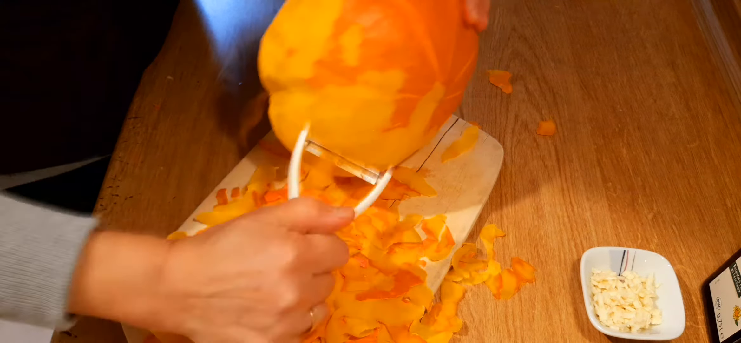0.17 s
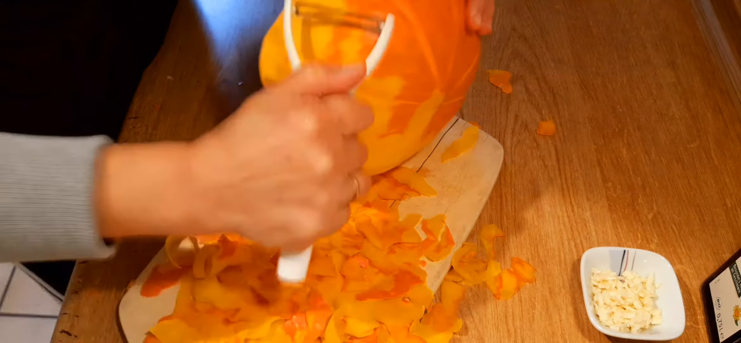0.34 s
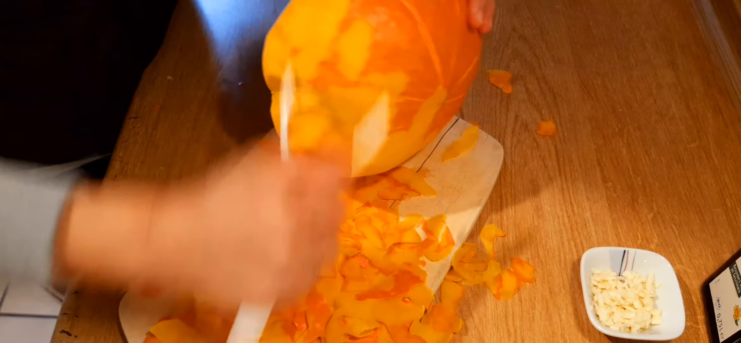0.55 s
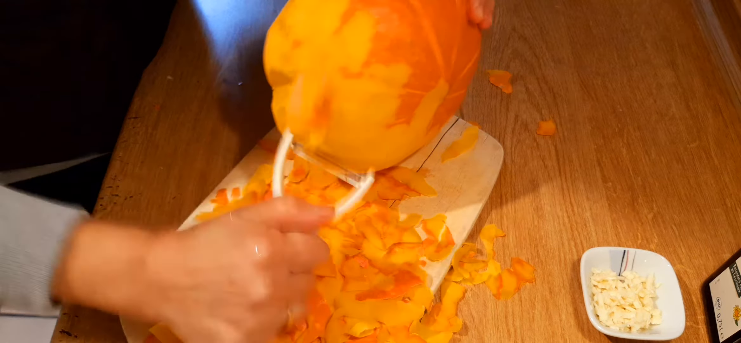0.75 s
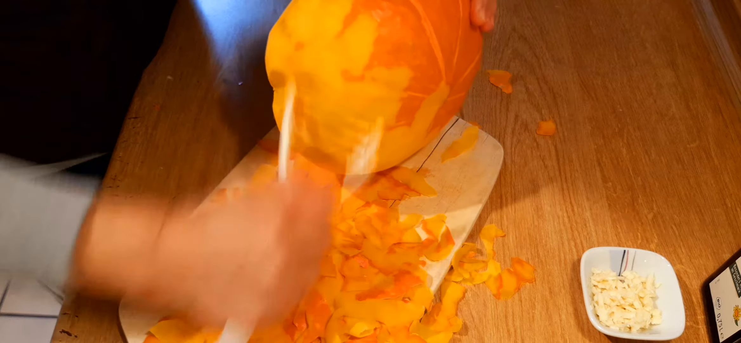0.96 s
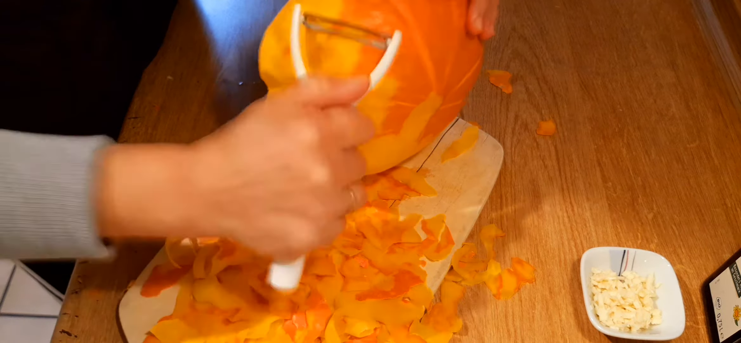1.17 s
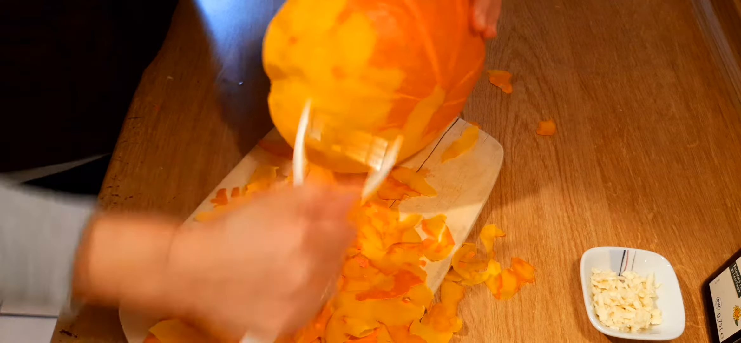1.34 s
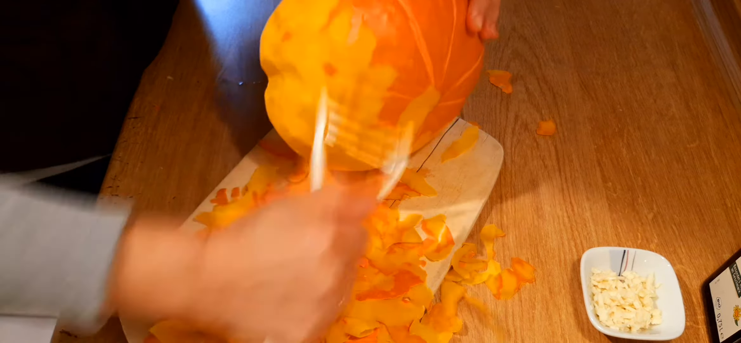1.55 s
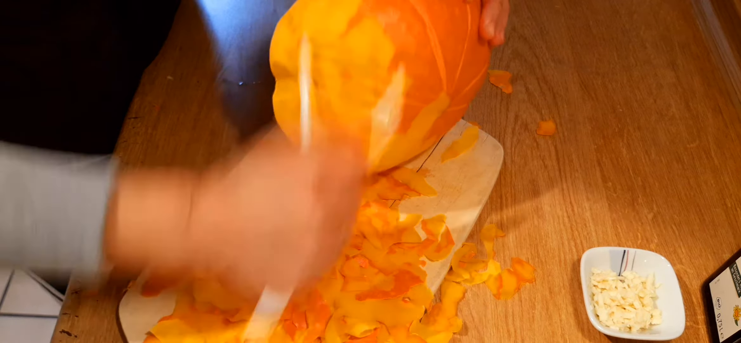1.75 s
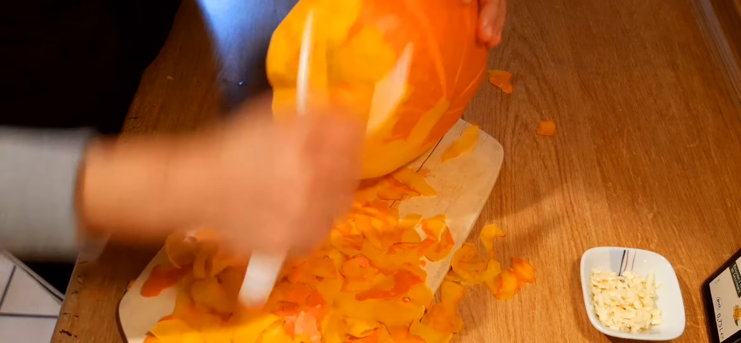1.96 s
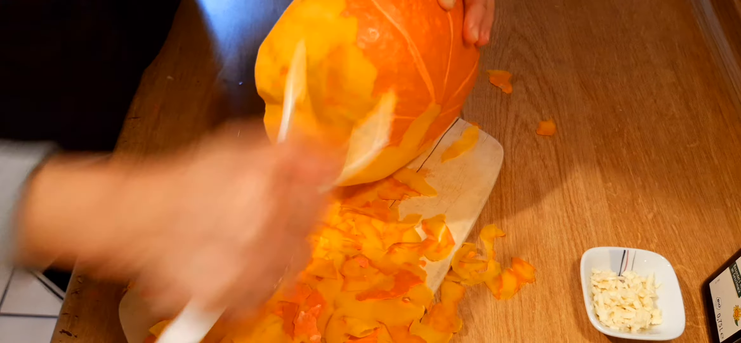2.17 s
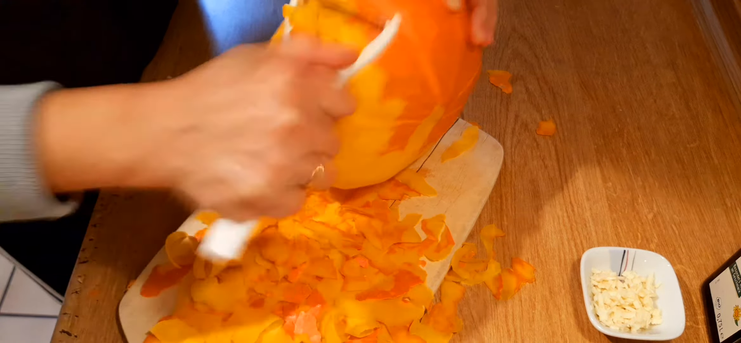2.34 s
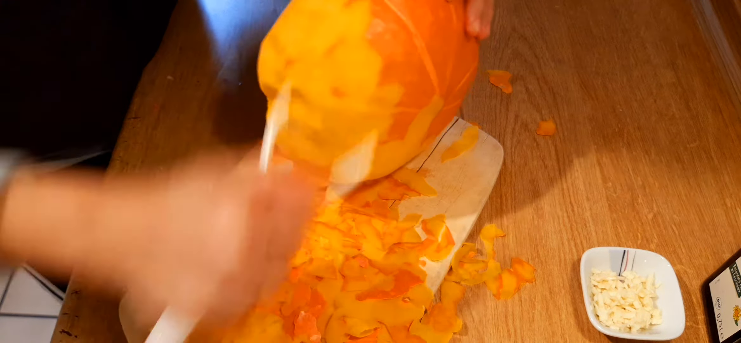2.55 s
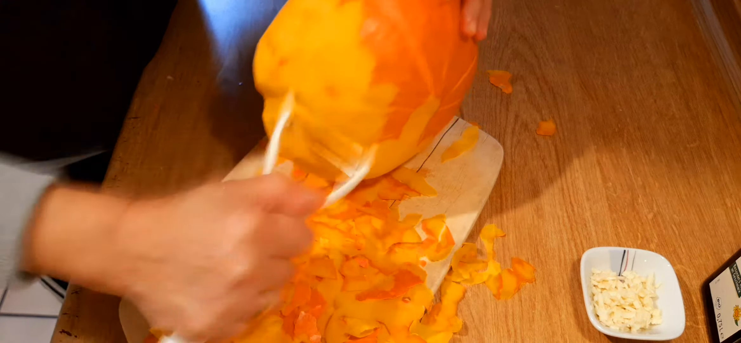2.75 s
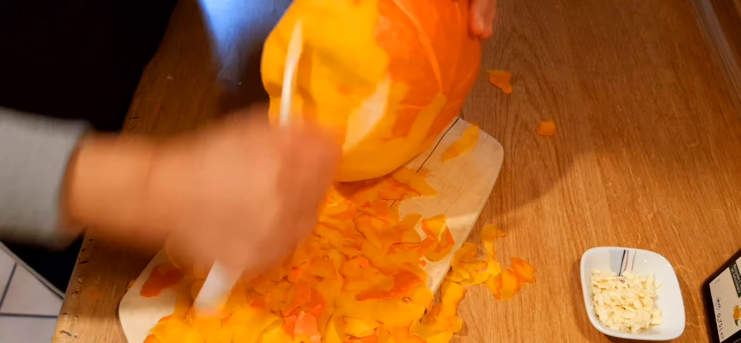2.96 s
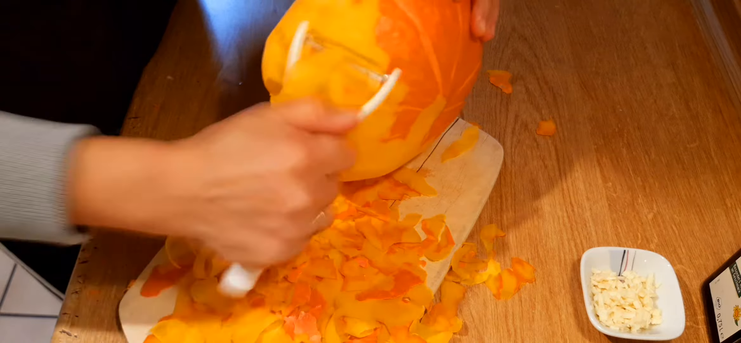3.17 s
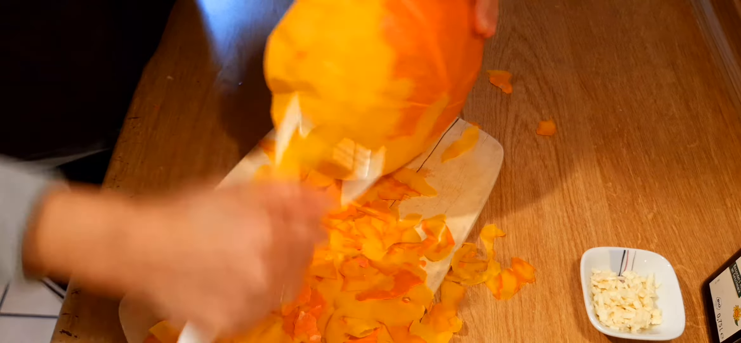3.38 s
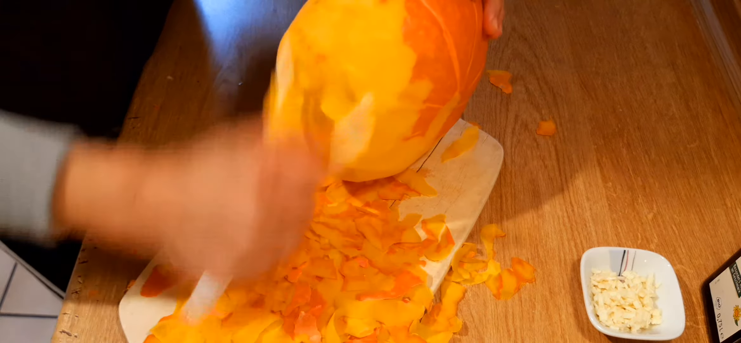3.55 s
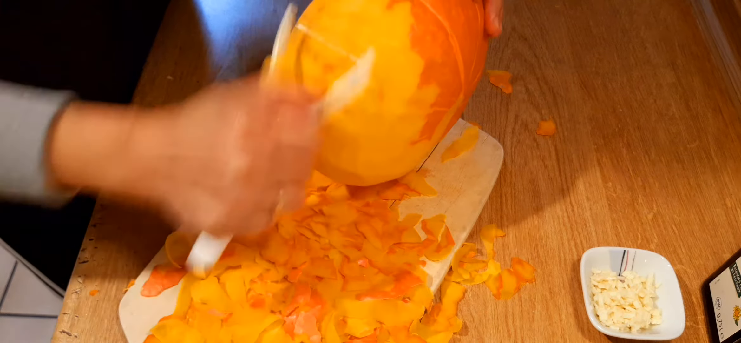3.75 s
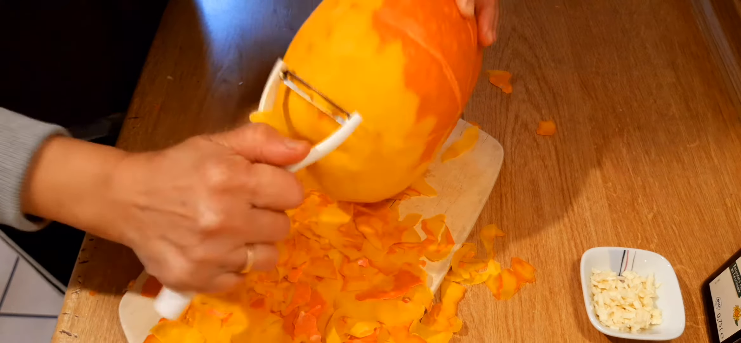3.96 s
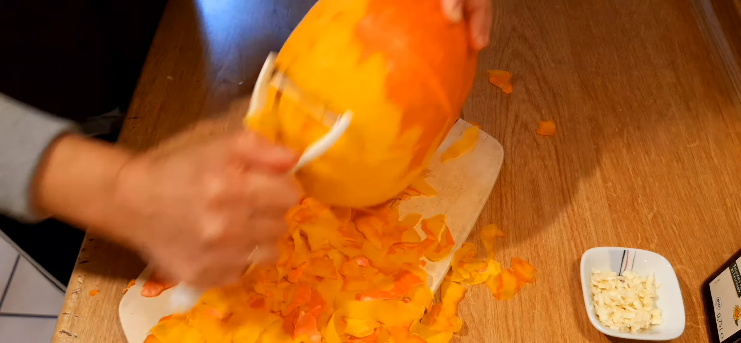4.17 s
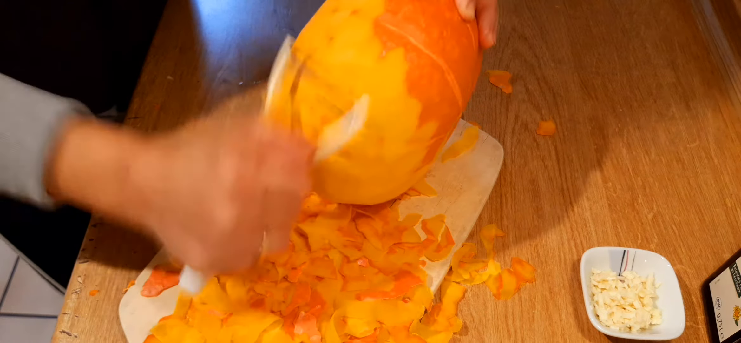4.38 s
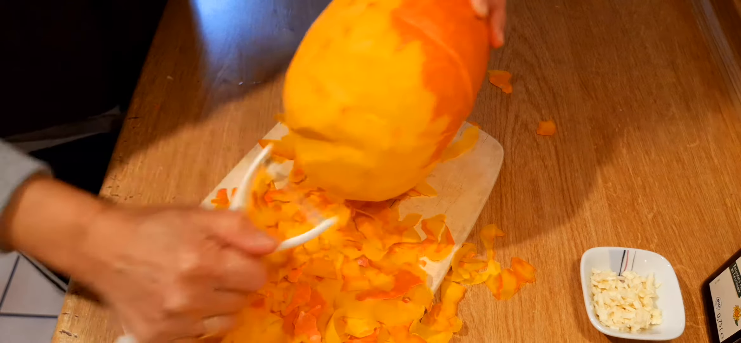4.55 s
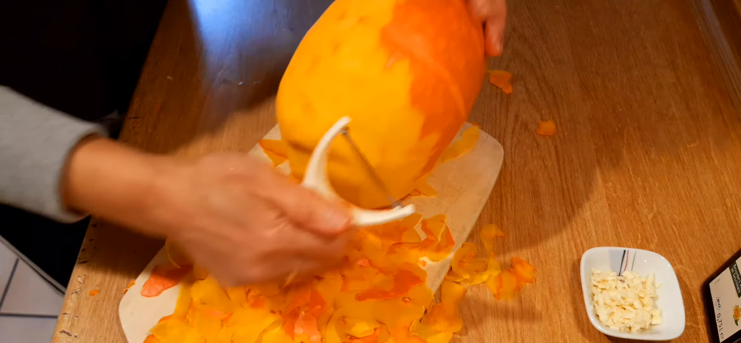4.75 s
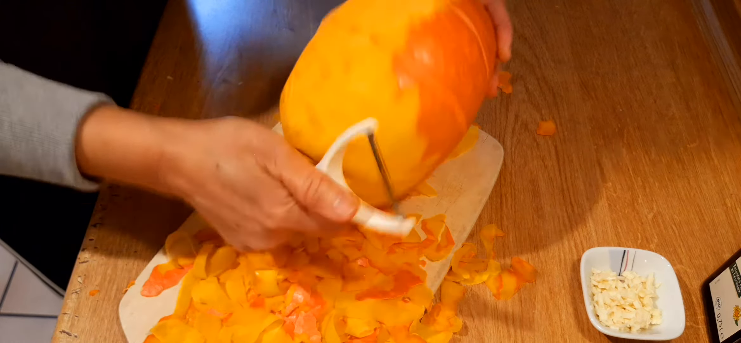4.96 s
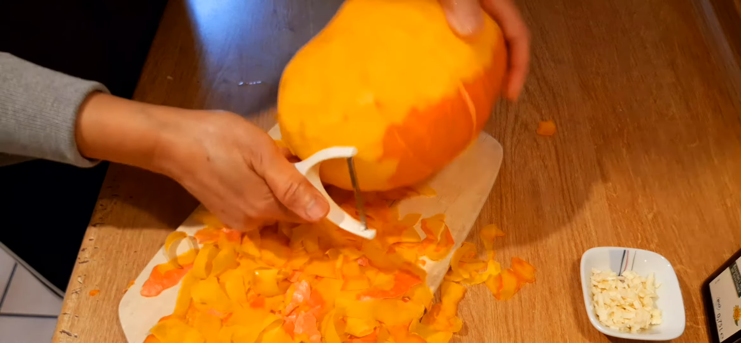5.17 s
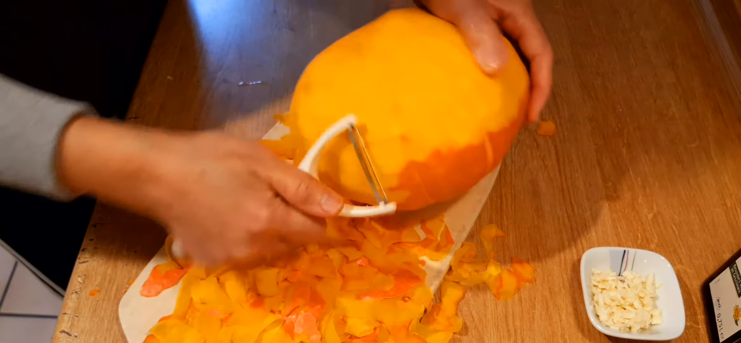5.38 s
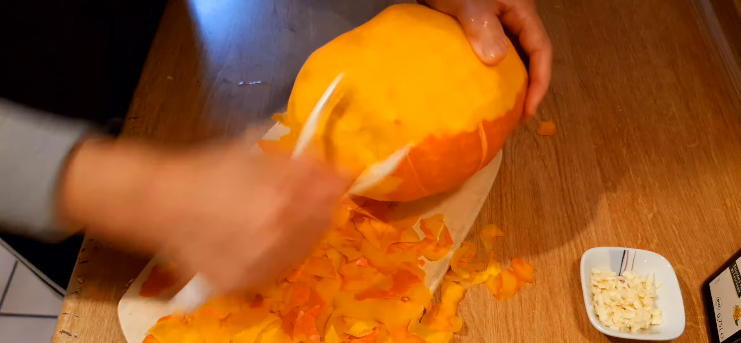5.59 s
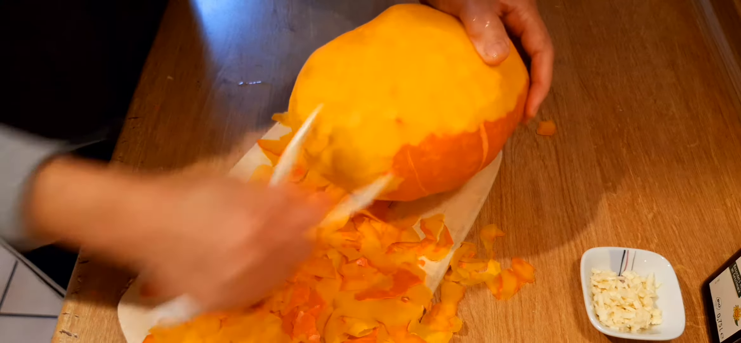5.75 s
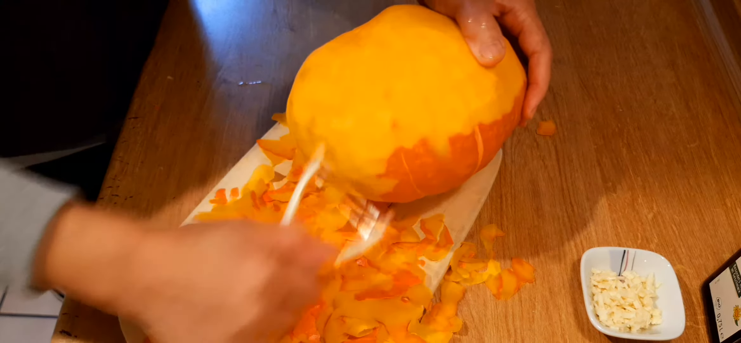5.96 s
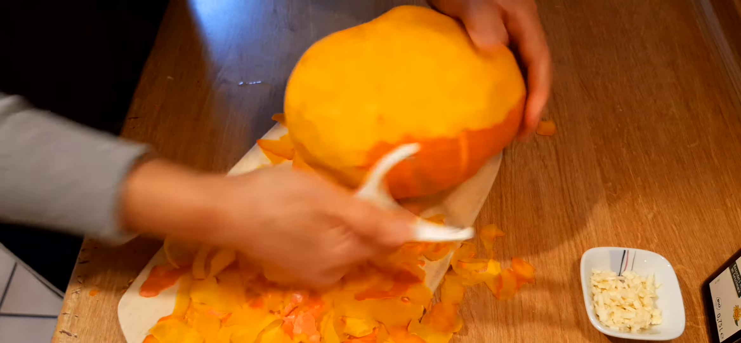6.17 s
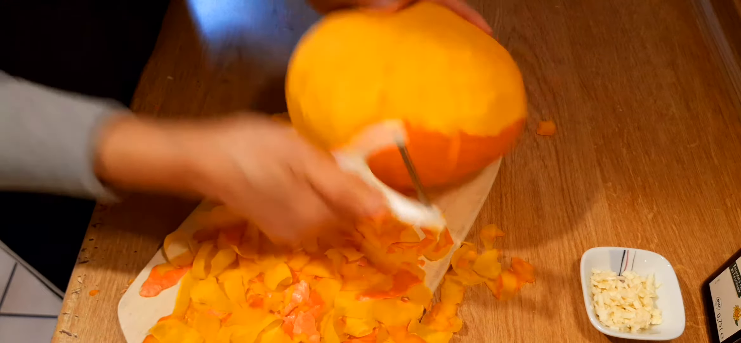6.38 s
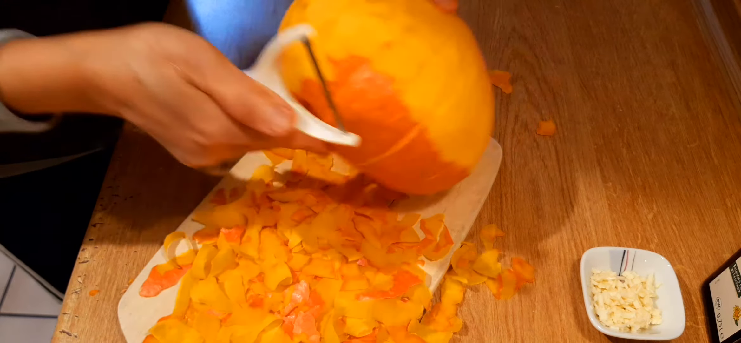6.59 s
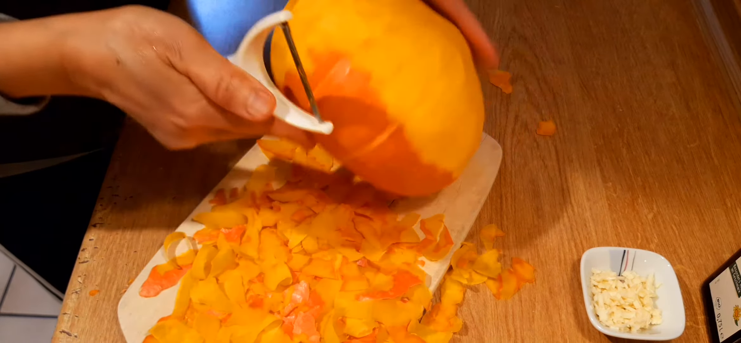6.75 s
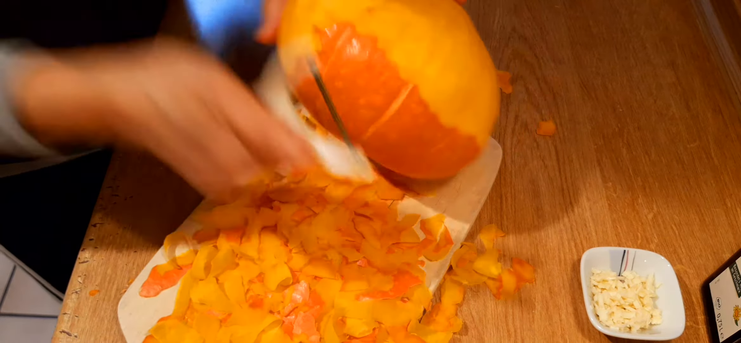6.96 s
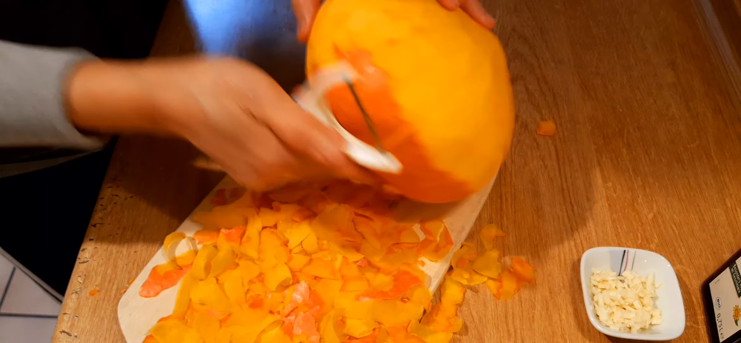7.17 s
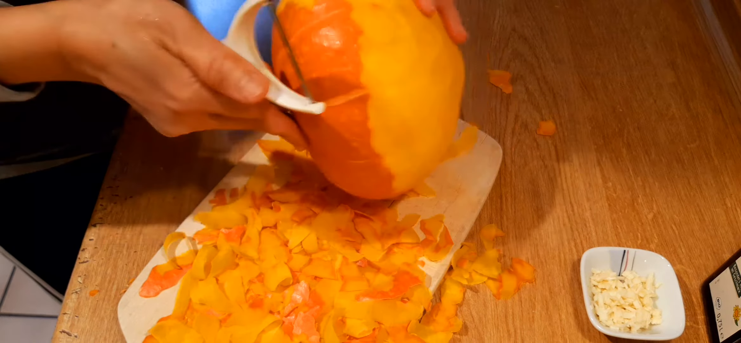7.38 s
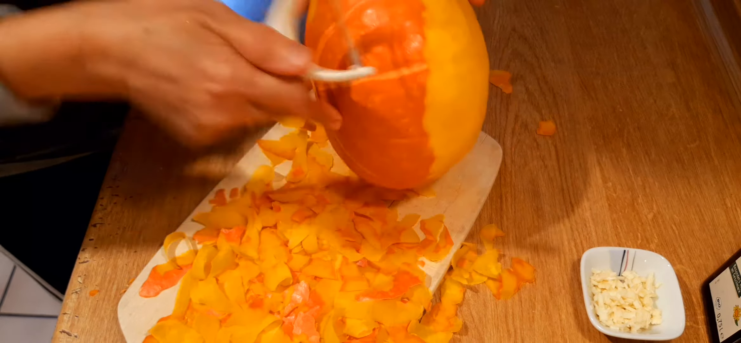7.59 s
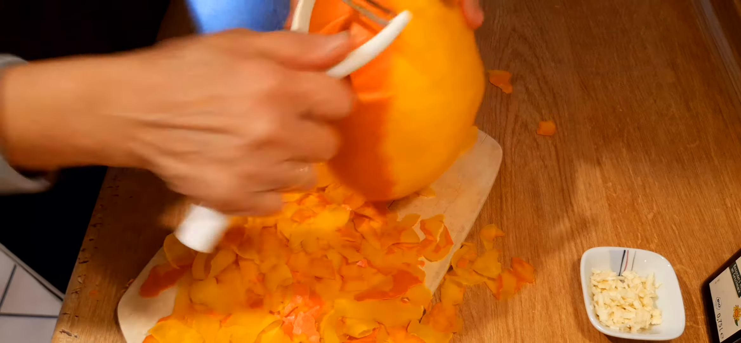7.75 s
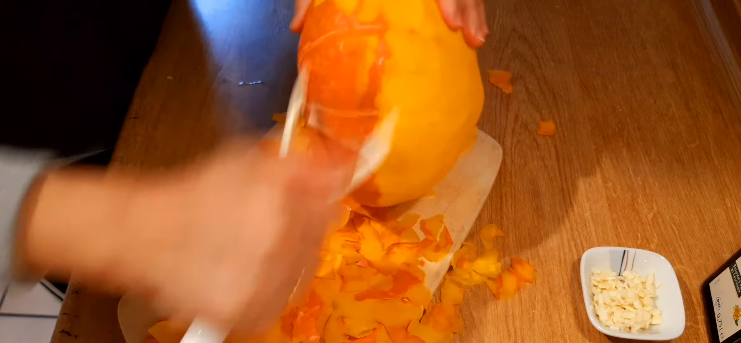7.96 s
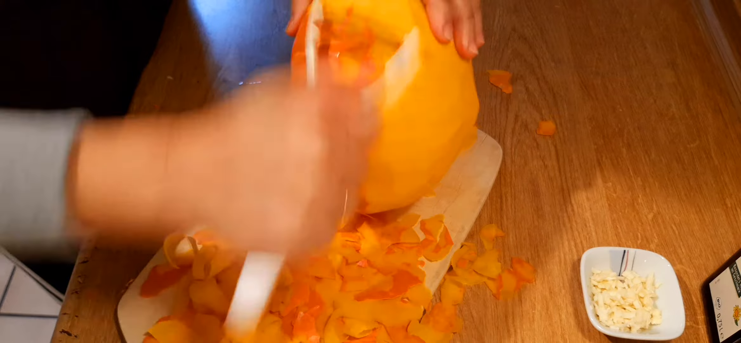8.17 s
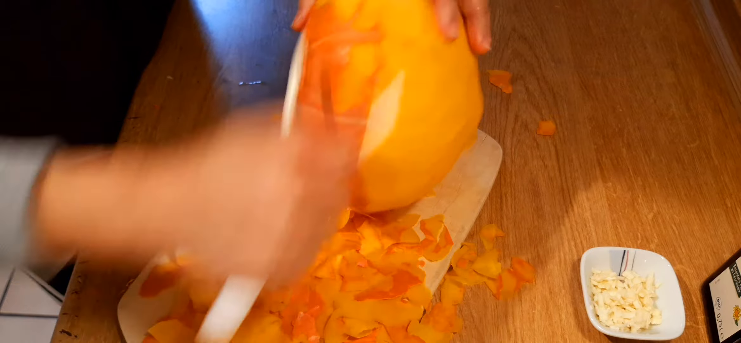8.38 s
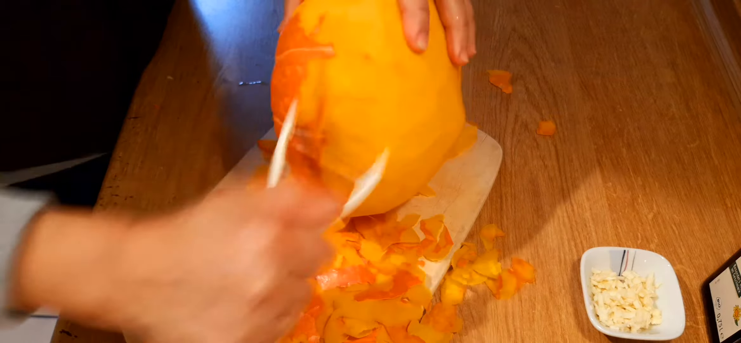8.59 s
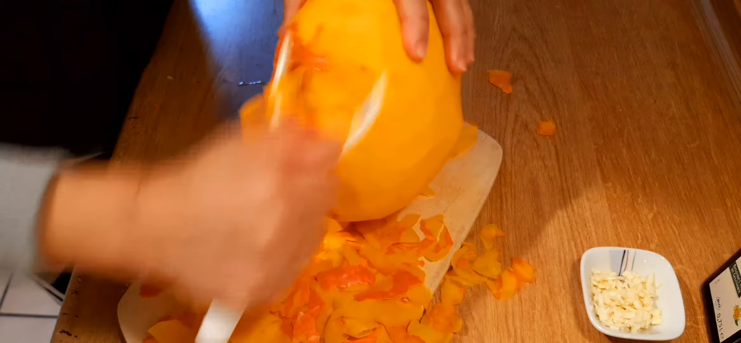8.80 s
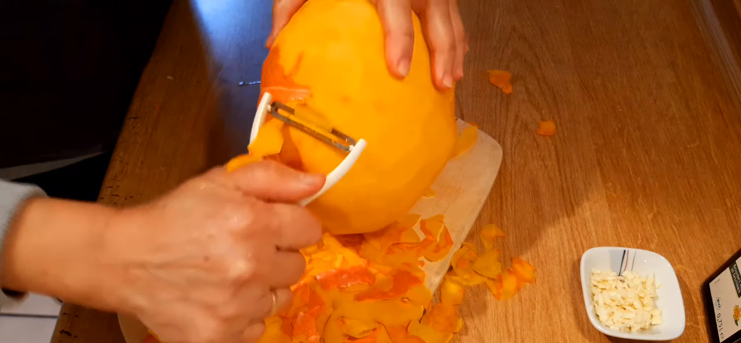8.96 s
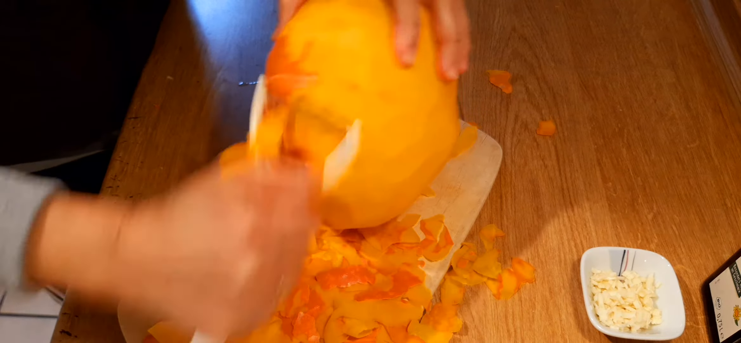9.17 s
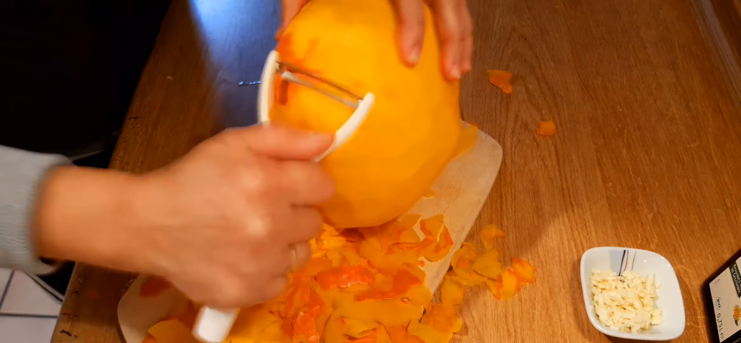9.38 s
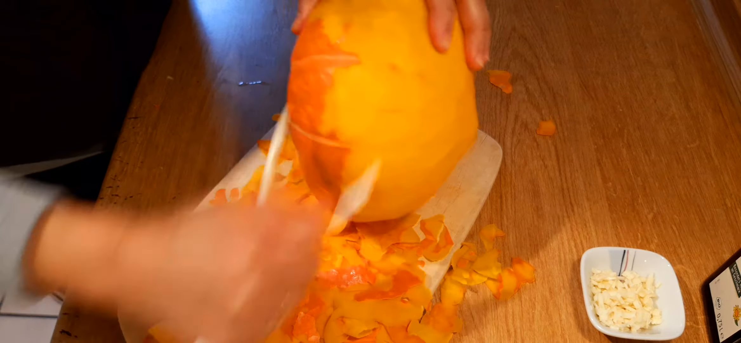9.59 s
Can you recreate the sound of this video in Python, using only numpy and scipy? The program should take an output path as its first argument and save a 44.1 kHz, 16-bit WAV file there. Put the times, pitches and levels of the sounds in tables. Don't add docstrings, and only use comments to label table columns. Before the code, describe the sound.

In a small kitchen, close to a stereo microphone, a swivel peeler scrapes a hard pumpkin about three or four times a second. Each stroke clicks on, hisses through the rind and rattles its blade. Around five seconds the fruit thuds onto the board and bounces; two strokes, soft handling and a lighter thump follow, then scraping resumes.

```python
import sys
import numpy as np
from scipy import signal
from scipy.fft import rfft, irfft, next_fast_len
from scipy.io import wavfile
from scipy.ndimage import uniform_filter1d, map_coordinates

SR = 44100
rng = np.random.default_rng(int(sys.argv[2]) if len(sys.argv) > 2 else 0)


def volts(x):
    e = np.asarray(x, float) / 20
    return 10 ** e


def pcm_store(signal):
    levels = np.round(np.clip(np.atleast_2d(signal), -1, 1) * 32767)
    wavfile.write(sys.argv[1], SR, levels.astype(np.int16).T)


N = 424683

# f/Hz, density/dB
TEAR_SPECTRUM = [(710, -28), (1500, -20), (2830, -4), (4360, -17.5), (5300, -6), (6160, -7.5), (11300, -9),
                 (16000, -10)]
# f/Hz, width/Hz, level/dB
FORK_MODES = [(2030, 700, -4.5), (2552, 484, 3), (3720, 510, -8.5)]
# f/Hz, gain/dB
FORK_LOW_CUT = [(1600, -9), (2100, -0.5)]
# f/Hz, width/Hz, level/dB
FLESH_MODES = [(540, 110, -9), (743, 45, 2), (954, 65, 5), (1159, 180, 2)]
# f/Hz, width/Hz, level/dB
BOARD_MODES = [(228, 19.3, 2), (290, 11.7, 2), (350.5, 47, -7.5), (407, 28.7, -5), (531, 110, -12)]


def peeler():
    hiss_db, blade_db, flesh_db = cuts()
    crack, strike, knock = bites()
    rattle = grit(spiky_db=0.86, lumpy_db=0.74, rate_hz=300)
    snaps = patchy(grit(spiky_db=2.5, lumpy_db=3.0, rate_hz=250), depth_db=4.5, bins=4, frames=5)
    chatter = patchy(grit(spiky_db=2.5, lumpy_db=2.5, rate_hz=78), depth_db=2.5, bins=2, frames=12)

    hiss = volts(hiss_db - 0.5) * coloured(snaps, TEAR_SPECTRUM)
    hiss += crack * coloured(rattle, TEAR_SPECTRUM)

    shake = volts(blade_db - 6.5) * chatter + strike * rattle
    blade = volts(-4.5) * ringing(shake, FORK_MODES)
    blade += volts(10.5) * sing(shake, width_hz=608, follow=0.21)
    blade += volts(16) * sing(shake, width_hz=51, follow=1.5)
    blade = filtered(blade, lambda hz: volts(along(FORK_LOW_CUT, hz)))

    press = volts(flesh_db - 6.5) * grit(spiky_db=2.0, lumpy_db=2.5, rate_hz=90)
    thump = knock * rattle
    flesh = ringing(press + thump, FLESH_MODES)
    return hiss + blade + flesh + volts(-3.0) * ringing(thump, BOARD_MODES)


# landing t/s, slide before bite t/s, cut t/s, tearing hiss level/dB
STROKES = [(0.0322, 0.044, 0.054, -37), (0.3284, 0.032, 0.096, -37), (.606, 0.023, 0.065, -36),
           (0.8703, 0.028, 0.074, -34.5), (1.1637, 0.026, 0.055, -34.5), (1.4319, 0.034, 0.059, -36.5),
           (1.709, 0.044, 0.055, -33.5), (2.0367, 0.043, 0.06, -32.5), (2.3354, 0.046, 0.064, -36),
           (2.6399, .028, 0.06, -37.5), (2.899, 0.032, 0.094, -34), (3.1693, 0.029, 0.068, -33),
           (3.4911, 0.023, 0.066, -35.5), (3.763, 0.031, 0.041, -37.5), (3.923, 0.0085, .012, -42),
           (4.0506, 0.037, 0.037, -37.5), (4.355, 0.016, .07, -32.5), (5.541, 0.037, 0.058, -38),
           (5.8316, 0.05, 0.047, -33.5), (7.8821, 0.0054, 0.083, -38), (8.1218, 0.041, 0.075, -37.5),
           (8.4251, 0.044, 0.072, -33), (8.734, 0.043, 0.036, -30.5), (9.103, 0.052, 0.056, -36),
           (9.3697, 0.032, 0.061, -31)]
# table boom/dB, board/dB, flesh over hiss/dB, blade over hiss/dB
PUSHES = [(-40, -49, -11.5, 2.5), (-41, -46, -6.5, 7), (-42, -47.5, -8.5, 6), (-43, -55, -13.5, 1.5),
          (-42.5, -54, -10, 4), (-45, -53, -9, 2.5), (-39.5, -48, -17, -6), (-45, -50.5, -10, 0),
          (-44.5, -56, -11, 0.5), (-42, -50, -10, 1.5), (-40, -46, -9.5, 2), (-44.5, -52.5, -8, 0),
          (-41.5, -46, -12.5, 1), (-51, -63.5, -3, 1.5), (-64, -58, -11, -8), (-51, -60, -5, 5),
          (-44, -52, -9, -0.5), (-45, -48, -5.5, 0), (-49.5, -52.5, -6, -2), (-39, -52.5, -9, 3),
          (-45.5, -49, -8.5, -1), (-48, -54.5, -10.5, -7), (-42.5, -55, -11.5, -1),
          (-53.5, -69, -7.5, -3.5), (-43.5, -48, -10.5, -2.5)]


def cuts():
    bite_s, lift_s, lift_db = 0.011, LIFT_S, -32.5
    stage = [0, 0, 1, 2, 2]
    blade_over_hiss_db = np.take((3, 10, 5), stage)
    flesh_over_hiss_db = np.take((7, 2.5, 1.5), stage)
    shapes = []
    for (s, slide, cut, db), (land_db, *_), (*_, flesh_db, blade_db) in zip(STROKES, LANDINGS, PUSHES):
        slide_db = -45 + 0.53 * (land_db + 22)
        hiss = np.array([slide_db, slide_db, db + 1, db + 1, db + lift_db])
        times = s + np.cumsum([0, slide, bite_s, cut - bite_s, lift_s])
        blade = hiss + blade_db + blade_over_hiss_db
        flesh = hiss + flesh_db + flesh_over_hiss_db
        shapes.append(np.transpose([times, hiss, blade, flesh]))
    return curves(shapes)


# peak/dB, blade over peak/dB, flesh over peak/dB
LANDINGS = [(-12.5, -4.5, -22), (-13, 0, -9), (-18, -2.5, -18), (-23, -14, -17), (-22.5, -0.5, -11.5),
            (-21.5, -3.5, -14.5), (-25.5, -10, -12), (-10.5, -25, -21.5), (-15.5, -6.5, -15.5),
            (-21.5, -7.5, -14), (-23, 0, -14), (-20.5, -2, -11.5), (-15.5, -14, -17.5), (-32, -5, -5.5),
            (-25, -18, -31), (-30, -10, -8), (-25, -10.5, -15), (-27, -22.5, -6.5), (-23, -14, -16.5),
            (-31, 7.5, -9), (-32, -0.5, -13), (-14.5, -29, -20), (-17, -22, -17.5), (-38, -8, -25),
            (-19.5, -30, -20.5)]
# t/s, peak/dB, blade over peak/dB, flesh over peak/dB
CATCHES = [(0.4493, -26.5, -1, -18), (1.7763, -18, -16, -32), (3.8069, -28, 7, -28),
           (3.9339, -24, -12, -25), (4.298, -34.5, -20, -44), (.272, -58, -20, -15),
           (0.697, -25.5, -10, -29), (4.3788, -27, -2, -32), (5.137, -37.5, 9, 13.5), (5.1766, -31, 7, 8.5),
           (5.886, -33.5, 9.5, -12), (6.0961, -45.5, -20.5, -36), (6.547, -58, 1, 16),
           (6.669, -42, 10, -11), (7.025, -52.5, 17, -5), (8.218, -18.5, -14, -9.5), (8.789, -24, -20, -27),
           (9.5665, -45, -11.5, -24)]


def bites():
    bursts = np.zeros((3, N + SR))
    t = np.arange(SR // 10) / SR
    edge = 1 - np.exp(-t / .0006)
    early = 1 + 0.49 * volts(-60 * t / .015)
    landings = [(stroke[0], *hit) for stroke, hit in zip(STROKES, LANDINGS)]
    for s, db, ring_db, knock_db in landings + CATCHES:
        t60_s = min(.036 * volts(-.3 * (db + 22)), .045)
        burst = volts(db - 4.0 - 60 * t / t60_s) * edge * early
        bursts[:, round(s * SR):][:, :len(t)] += volts([[0], [ring_db], [knock_db]]) * burst
    return bursts[:, :N]


LIFT_S = 0.026
# f/Hz, level/dB
BLADE_NOTES = [(2900, 3), (3006, -7), (2970, -10), (3000, -2), (2975, -4.5), (3000, -0.5), (2870, -2.5),
               (2935, -1), (3010, -1), (2990, 0), (3070, -5), (3120, -6.5), (3050, 4), (2835, 5),
               (2750, -11), (2740, -1), (2876, 4), (3500, -5.5), (3055, 3.5), (3106, 2), (3013, 3),
               (3050, -6), (3010, -3), (2960, -1), (2880, -3)]


def sing(force, width_hz, follow):
    out = np.zeros_like(force)
    for (s, slide, cut, _), (hz, db) in zip(STROKES, BLADE_NOTES):
        start, stop = round(s * SR), round((s + slide + cut + LIFT_S) * SR)
        push = np.pad(force[:, start:stop], ((0, 0), (0, SR // 4)))[:, :N - start]
        b, a = signal.iirpeak(hz, hz / width_hz, SR)
        out[:, start:start + push.shape[1]] += volts(follow * db) * signal.lfilter(b, a, push)
    return out


# t/s, peak/dB
DROPS = [
    (5.136, -11.5),
    (5.178, -17),
    (6.55, -27.5),
    (6.672, -29.5),
]
# peak t/s, rise t/s, fall t/s, boom/dB,
# board/dB
SHIFTS = [(.02, 0.3, .2, -47.5, -54), (4.3, .12, 0.31, -50, -69.5), (4.88, .3, 0.43, -49.5, -64),
          (5.02, 0.53, .3, -61, -59), (5.139, .004, 0.67, -25.5, -27.5), (5.2, .03, 0.42, -24, -28.5),
          (5.36, .1, .3, -40, -42.5), (5.545, .005, 0.11, -62, -40), (5.836, .005, 0.12, -60, -40),
          (6.33, 0.059, 0.21, -57.5, -71.5), (6.553, 0.0048, 0.45, -29, -42.5),
          (6.69, 0.14, 0.22, -45, -43), (6.96, 0.15, 0.33, -48, -71), (7.03, .15, 0.24, -46, -61),
          (7.32, 0.51, .18, -48.5, -61.5), (7.56, 0.29, 0.33, -70.5, -81), (7.87, 0.069, .2, -47.5, -50.5),
          (8.124, 0.0031, .2, -60, -35.5), (8.426, 0.0034, 0.14, -60, -35), (9.12, 0.066, 0.18, -48, -74)]
# f/Hz, width/Hz, level/dB
TABLE_MODES = [(51.5, 16, 0.5), (74.3, 15.3, 1.5), (107.1, 11, -1), (125.3, 24.2, -8), (156, 23.7, -15)]


def table():
    boom_db, board_db = curves(leans() + swells(SHIFTS))
    blows = np.zeros((2, N))
    for s, db in DROPS:
        blows[0, round(s * SR)] = volts(db)
    boom_force = volts(boom_db + 2.02) * grit(spiky_db=2.0, lumpy_db=0.55, rate_hz=29)
    board_force = volts(board_db + 0.42) * grit(spiky_db=1.0, lumpy_db=3, rate_hz=60)
    boom = ringing(boom_force + volts(26) * blows, TABLE_MODES)
    board = ringing(board_force + volts(9) * blows, BOARD_MODES)
    boom = ports(boom, pan_db=-3.0, lag=1.8, alike=0.97, order=1)
    return boom + ports(board, pan_db=-2.5, lag=1.6, alike=0.81, order=1)


def leans():
    early_s, lean_s, ease_s = 0.0087, 0.014, 0.19
    shapes = []
    for (s, slide, cut, _), (boom_db, board_db, *_) in zip(STROKES, PUSHES):
        times = s - early_s + np.cumsum([0, lean_s, early_s + slide + cut - lean_s, ease_s])
        boom = boom_db + np.array([-16, 0, 0, -35])
        board = board_db + np.array([-16, 0, 0, -34.5])
        shapes.append(np.transpose([times, boom, board]))
    return shapes


# peak t/s, rise t/s, fall t/s, rub/dB, dull part/dB
HAND_MOVES = [(4.76, .15, .25, -69.5, -87), (4.966, 0.22, 0.74, -60.5, -65.5), (5.14, .005, .3, -43, -36),
              (5.19, 0.068, 0.22, -36.5, -33), (5.3, .1, 0.42, -57.5, -44.5),
              (6.28, 0.18, 0.55, -54.5, -67.5), (6.45, 0.55, 0.77, -61.5, -82.5),
              (6.555, .01, 0.76, -66, -53.5), (6.79, 0.79, 0.82, -54, -74), (7.0, .3, 0.29, -56.5, -63.5),
              (7.2, 0.071, 0.33, -57, -67.5), (7.278, 0.42, 0.18, -49, -54.5), (2.01, .4, 0.12, -68, -62),
              (7.49, 0.11, 0.11, -68, -90), (7.66, .15, 0.17, -68.5, -88), (9.03, 0.11, 0.16, -51, -63.5),
              (9.095, 0.033, .1, -46.5, -67)]
# f/Hz, density/dB
SKIN_SPECTRUM = [(1180, -29), (2000, -6), (2180, -3.5), (2440, -3), (13100, -12), (16000, -19.5)]
# f/Hz, density/dB
ROLL_SPECTRUM = [(260, -19), (450, -1.5), (698, 1), (853, -8.5), (1310, 0.5), (4000, -15.5), (5200, -39),
                 (8800, -120)]


def hands():
    rub_db, dull_db = curves(swells(HAND_MOVES))
    rub = coloured(grit(spiky_db=3.0, lumpy_db=2.0, rate_hz=100), SKIN_SPECTRUM)
    crush = coloured(grit(spiky_db=0.3, lumpy_db=1.0, rate_hz=70), ROLL_SPECTRUM)
    return volts(rub_db - 2.15) * rub + volts(dull_db) * crush


# f/Hz, t60/s
KITCHEN_T60 = [(150, 0.12), (1000, 0.32), (3000, 0.33), (6000, 0.28), (15000, 0.18)]


def kitchen(x):
    hz, t, z = signal.stft(rng.standard_normal((2, SR // 2)), SR, nperseg=256)
    decay = volts(-60 * t / along(KITCHEN_T60, hz)[:, None])
    tail = signal.istft(z * decay, SR, nperseg=256)[1]
    delayed = np.pad(x, (130, 0))[None]
    return signal.fftconvolve(delayed, tail / np.linalg.norm(tail[0]), axes=1)[:, :N]


# f/Hz, density/dB
HUSH_SPECTRUM = [(18, -43), (30, -29), (71, -5.5), (266, -14.5), (374, -18), (2830, -29.5), (4910, -21),
                 (16000, -26)]


def hush():
    return volts(-71.5) * coloured(rng.standard_normal((2, N)), HUSH_SPECTRUM)


def unit(x):
    return x / np.sqrt(np.mean(x ** 2) + 1e-20)


def along(points, hz):
    f, v = np.transpose(points)
    return np.interp(np.log(hz + 1), np.log(f + 1), v)


def swells(rows):
    shapes = []
    for s, rise, fall, a, b in rows:
        shapes.append([(s - rise, a - 44, b - 44), (s, a, b), (s + fall, a - 44, b - 44)])
    return shapes


def curves(shapes):
    out = np.full((len(shapes[0][0]) - 1, N), -120.)
    for rows in shapes:
        s, *cols = np.transpose(rows)
        n = np.arange(max(round(s[0] * SR), 0), min(round(s[-1] * SR), N))
        out[:, n] = np.maximum(out[:, n], [np.interp(n / SR, s, c) for c in cols])
    return out


def wobble(rate_hz):
    coarse = np.arange(0, N + 16, 16)
    knots = rng.standard_normal(int(N * rate_hz / SR) + 4)
    return np.interp(np.arange(N), coarse, map_coordinates(knots, [coarse * rate_hz / SR]))


def grit(spiky_db, lumpy_db, rate_hz):
    spikes = np.minimum(rng.exponential(size=N), 5)
    sizes = volts(spiky_db * spikes + lumpy_db * wobble(rate_hz))
    return unit(sizes * rng.standard_normal((2, N)))


def patchy(x, depth_db, bins, frames):
    z = signal.stft(x, nperseg=256)[2]
    field = rng.standard_normal(z.shape[1:])
    field = uniform_filter1d(field, size=bins, axis=0)
    field = uniform_filter1d(field, size=frames, axis=1)
    return unit(signal.istft(z * volts(depth_db * unit(field)), nperseg=256)[1][:, :N])


def filtered(x, response):
    m = next_fast_len(N + SR // 2)
    return irfft(rfft(x, m) * response(np.fft.rfftfreq(m, 1 / SR)), m)[..., :N]


def coloured(x, spectrum):
    return unit(filtered(x, lambda hz: volts(along(spectrum, hz))))


def ringing(force, modes):
    def body(f):
        total = 0
        for k, (centre, width, db) in enumerate(modes):
            damping = 1j * f * width
            total = total + (-1) ** k * volts(db) * damping / (centre ** 2 - f * f + damping)
        return total
    return filtered(force, body) / np.sqrt(np.mean(abs(body(np.arange(SR // 2))) ** 2))


def ports(x, pan_db, lag, alike, order=3):
    turn = np.arccos(np.clip(alike, 0, 1)) / 2
    pair = np.cos(turn) * x[0] + np.sin(turn) * x[1] * np.array([[1], [-1]])
    n = np.arange(N)
    left = map_coordinates(pair[0], [n + lag / 2], order=order)
    right = map_coordinates(pair[1], [n - lag / 2], order=order)
    return volts([[pan_db / 2], [-pan_db / 2]]) * [left, right]


def scene():
    blade, skin = peeler(), hands()
    drift = 3.92 + 1.4 * wobble(6)
    near = ports(blade, pan_db=-1.5, lag=drift, alike=0.49)
    near = near + ports(skin, pan_db=-0.5, lag=7.4, alike=0.25)
    room = volts([[-7.5], [-5.5]]) * kitchen(blade[0]) + volts(-8) * kitchen(skin[0])
    return near + room + table() + hush()


def low_pass(x):
    return signal.sosfilt(signal.butter(12, 17020, fs=SR, output="sos"), x)


# f/Hz, gain/dB
MIC_RESPONSE = [(30, -26), (44, -4), (60, 0), (8000, -0.1), (15600, 1.5), (15900, -29.5), (17500, -39.5)]


def record(dry):
    mix = filtered(dry, lambda hz: volts(along(MIC_RESPONSE, hz)))
    return low_pass(mix)


dry = scene()
out = record(dry)
pcm_store(out)
```